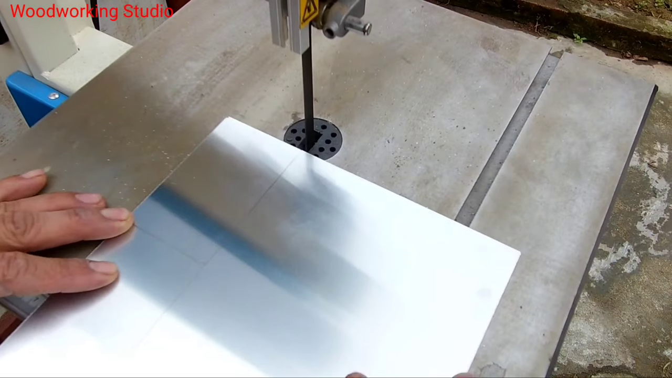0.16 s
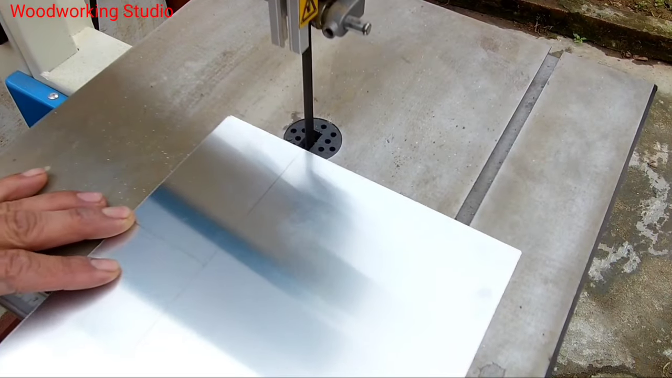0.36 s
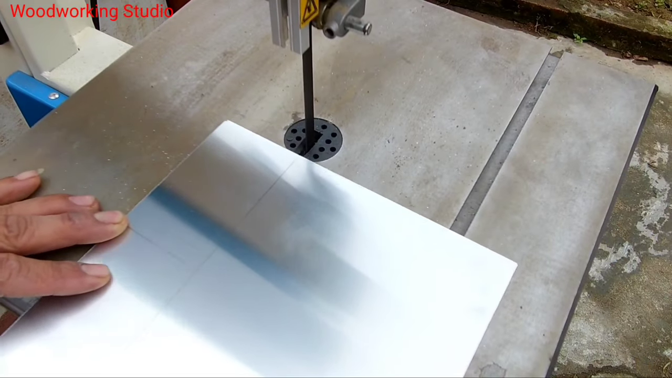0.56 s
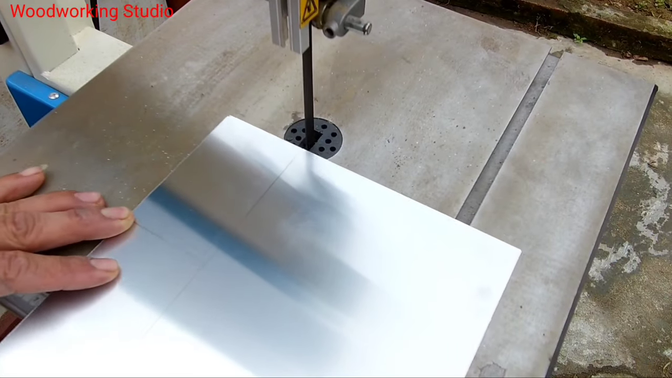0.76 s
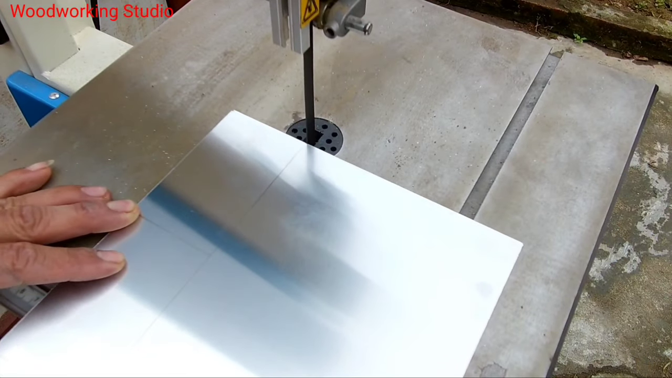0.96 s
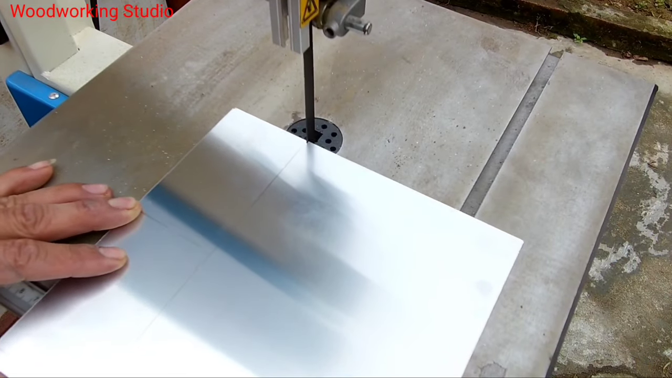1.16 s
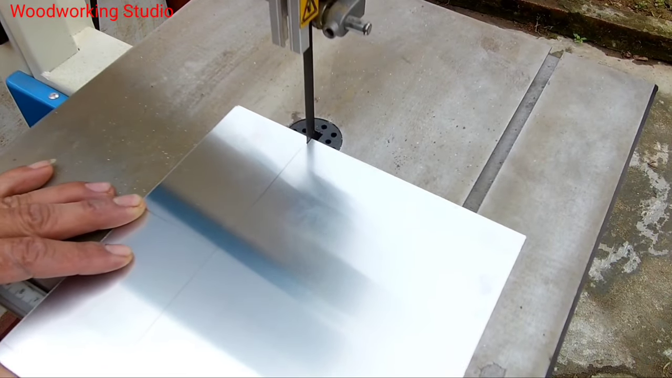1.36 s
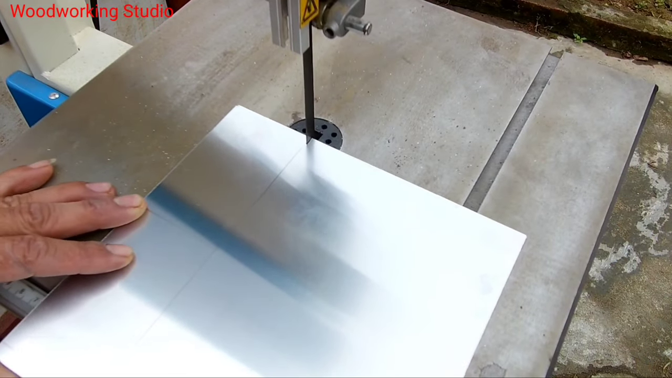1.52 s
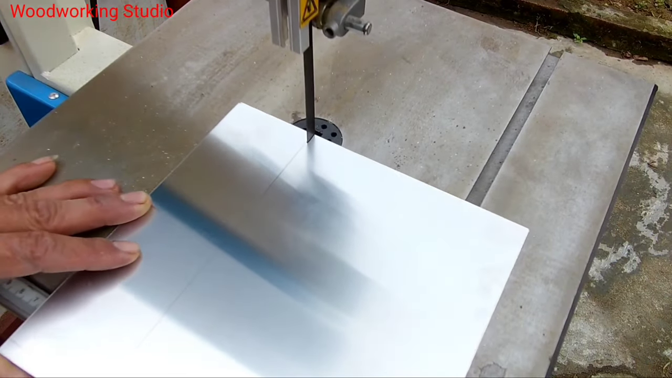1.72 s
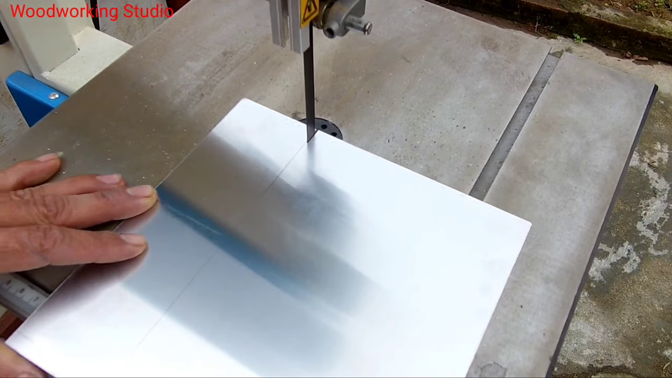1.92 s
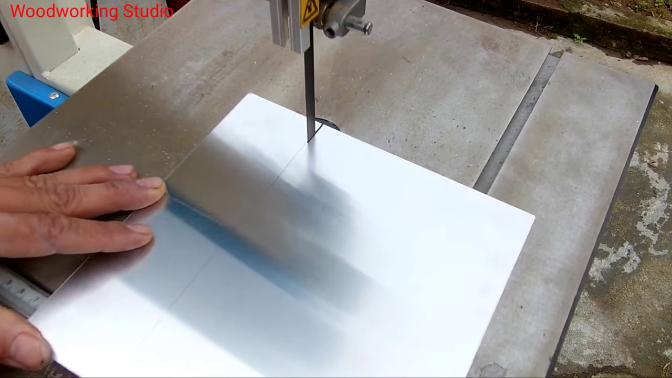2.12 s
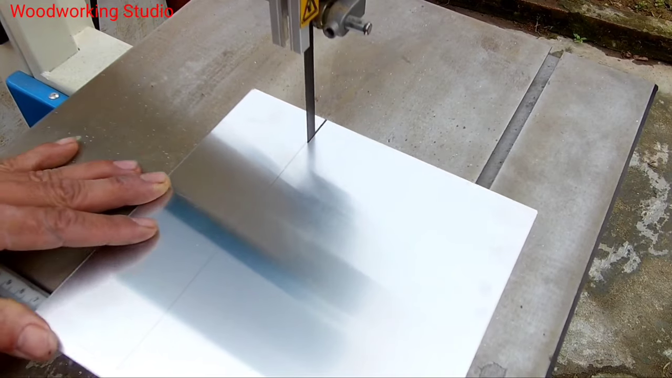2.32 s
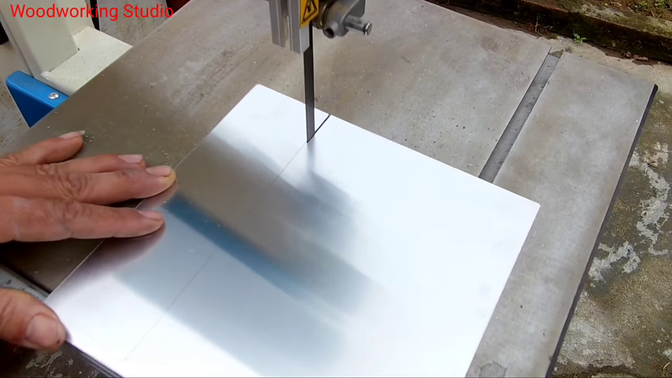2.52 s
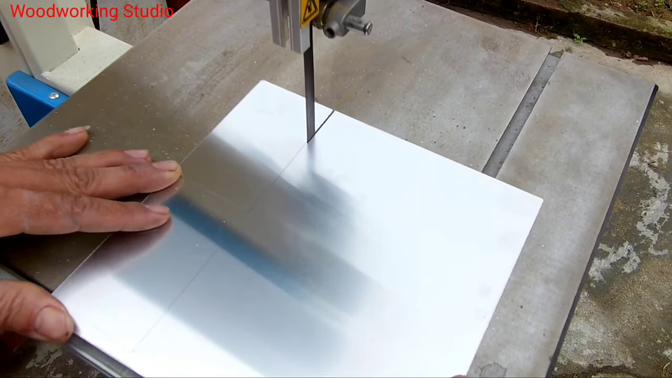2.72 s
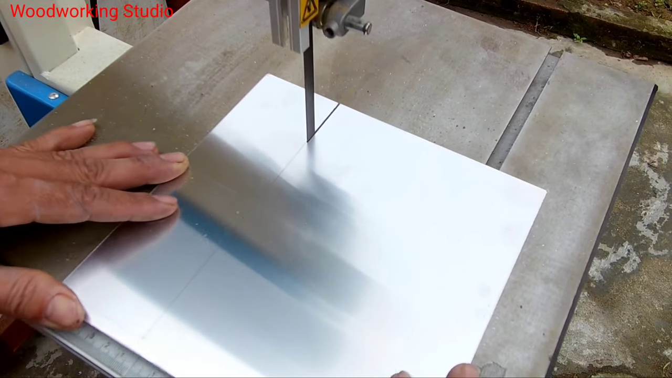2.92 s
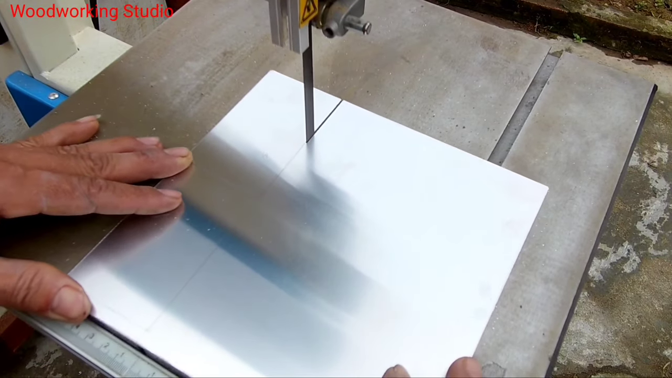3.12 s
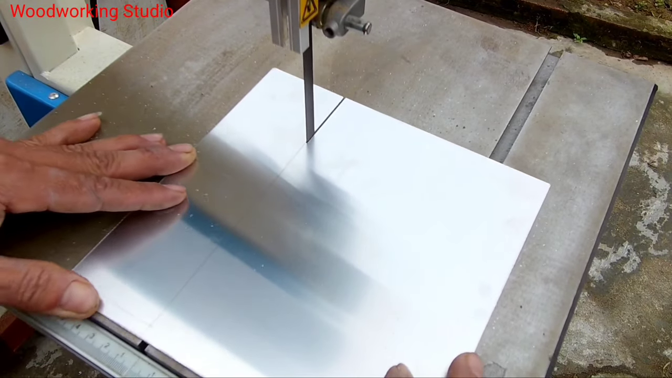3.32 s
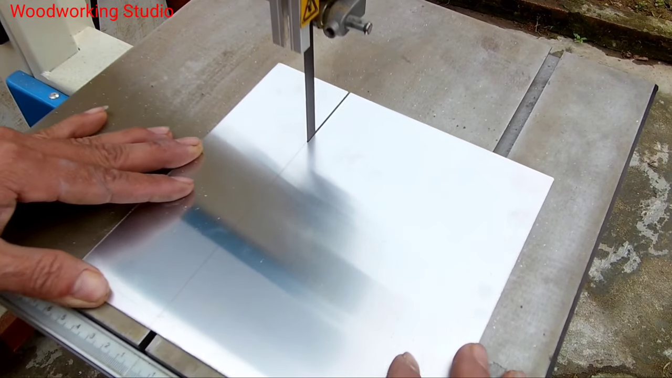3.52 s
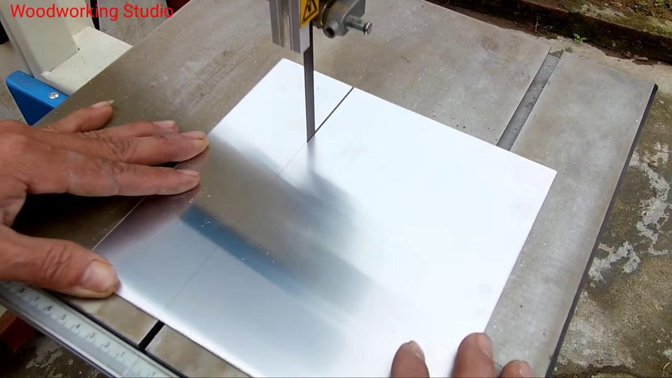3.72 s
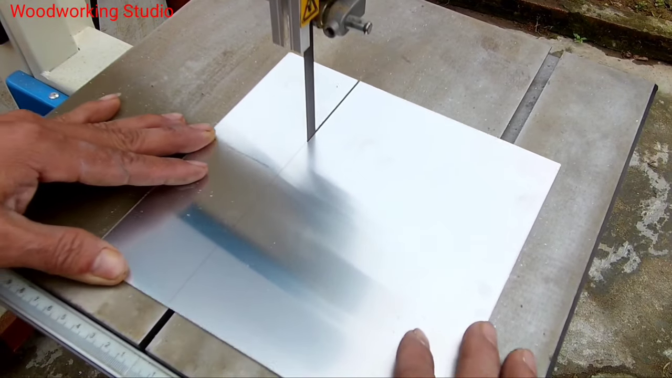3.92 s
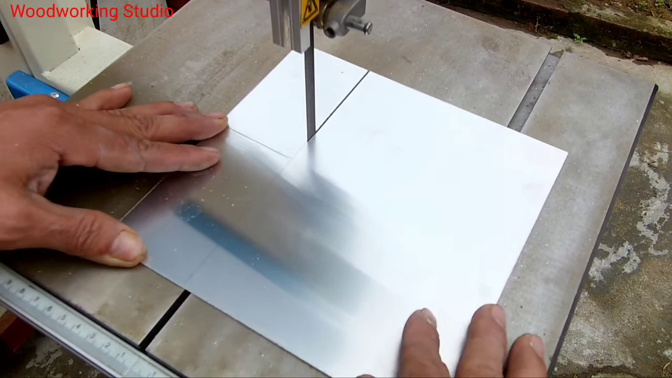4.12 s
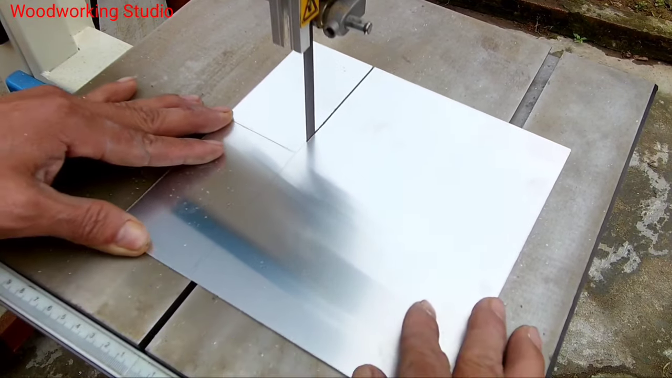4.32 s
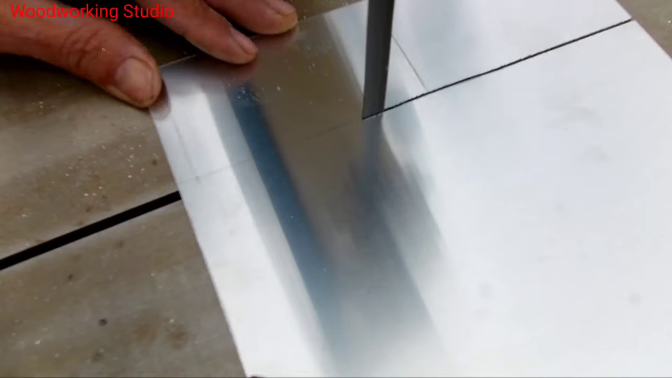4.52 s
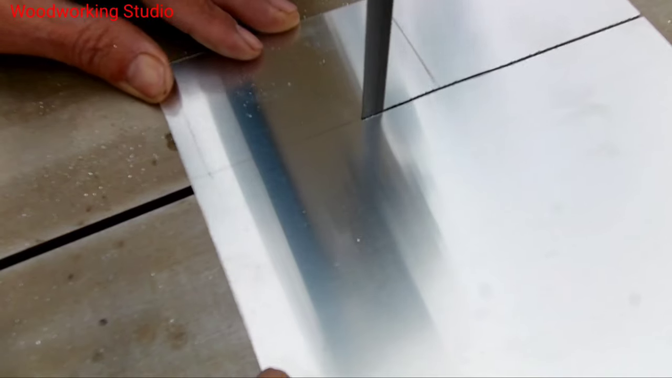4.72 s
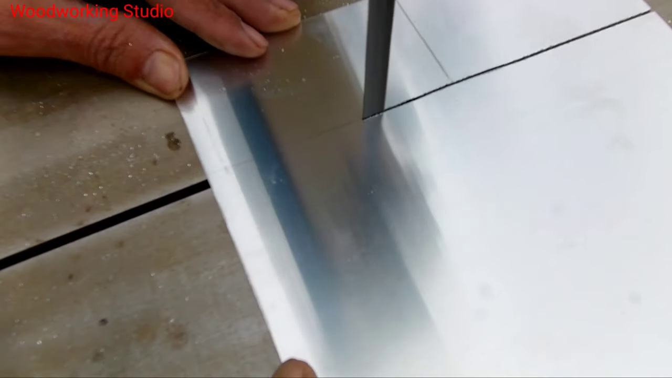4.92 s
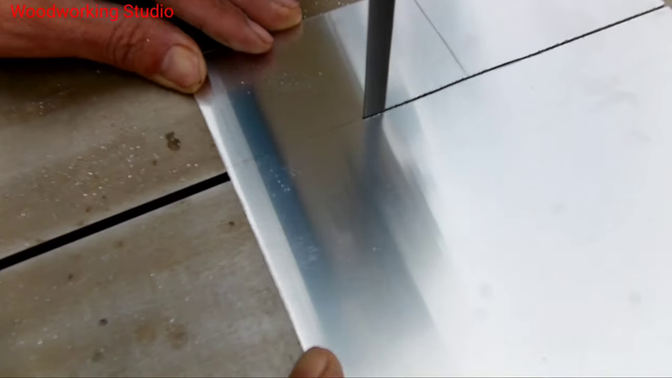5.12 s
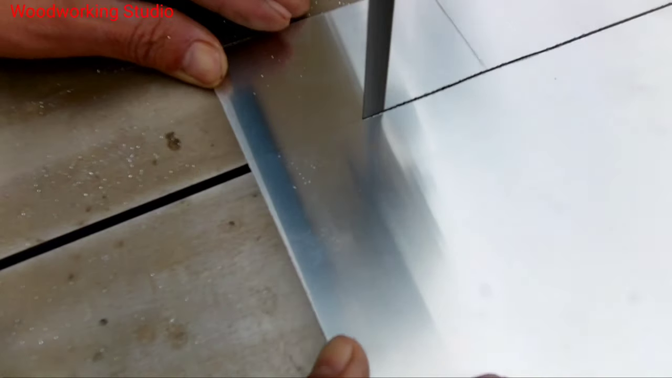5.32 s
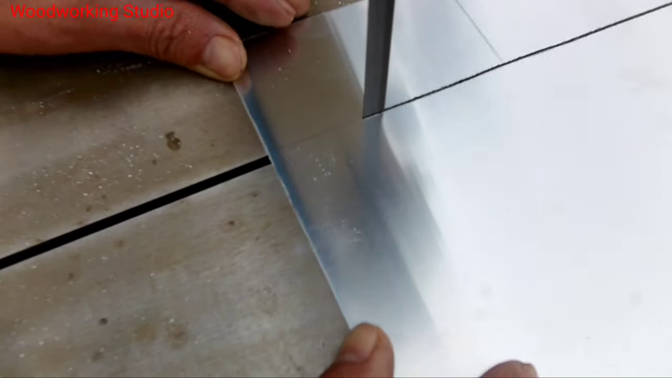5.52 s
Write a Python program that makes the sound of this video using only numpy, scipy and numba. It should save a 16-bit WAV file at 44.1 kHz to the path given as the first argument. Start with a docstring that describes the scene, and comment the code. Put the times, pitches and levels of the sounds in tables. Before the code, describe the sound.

A band saw hums quietly for a second, then bites thin sheet metal with a loud buzzing whine, rasp and rattling knocks, briefly dropping silent.

```python
"""Band saw cutting thin sheet metal

A band saw idles, then its teeth bite into a thin metal sheet pushed across the table, close to a small microphone.
Teeth strike at a nearly steady rate and whine as harmonics and narrow noise; scraping clicks ring the sheet in
resonances, one of which shifts in pitch as the cut grows; filtered clicks make the rasp and hiss of chips.
Noise through resonances makes the blade hum and tick; decaying sines are the sheet knocking on the table.
The input overloads, and the sound drops out for a moment."""
import sys
import numpy as np
from scipy import signal
from scipy.fft import rfft, irfft, next_fast_len
from scipy.io import wavfile
from scipy.ndimage import uniform_filter1d
from numba import njit

SR = 44100
rng = np.random.default_rng(int(sys.argv[2]) if len(sys.argv) > 2 else 0)


def volts(x):
    """Linear amplitude factor 10**(x/20) for a level x in dB, scalar or array-like."""
    e = np.asarray(x, float) / 20
    return 10 ** e


def bounce(signal):
    """Save signal as a 16-bit WAV file at the path given by the first command-line argument."""
    frames = np.transpose(np.atleast_2d(signal))
    limited = np.clip(frames, -1, 1)
    pcm = np.round(limited * 32767).astype(np.int16)
    wavfile.write(sys.argv[1], SR, pcm)


N = 249606
T = np.arange(N) / SR

# How hard the sheet is fed into the teeth. Each row: time in seconds, feed in dB.
FEED = [(0.97, -11), (1.05, -0.5), (1.33, 0), (1.39, 1.5), (1.586, -7), (1.69, 0), (1.8, 0), (2.3, -0.5),
        (3.0, -0.8), (3.3, -3), (3.46, -0.5), (3.6, -3), (4.05, -0.4), (4.44, -1.2), (4.62, 1),
        (4.98, -0.8), (5.1, 1), (5.66, -0.8)]
# Teeth catching the edge of the sheet. Each row: start in seconds, strength in dB.
CATCH = [(.9425, -45), (.9495, -30.5), (.9575, -39), (.9755, -45), (.9815, -31), (.9945, -31),
         (1.5416, -32), (1.5495, -36), (1.649, -38), (1.676, -30)]
# Low modes of the sheet. Each row: pitch in Hz, relative level in dB, 60 dB decay time in seconds.
SHEET_LOW_MODES = [(373.5, 3, 0.053), (740, -5.5, 0.05), (582, -10.5, 0.027)]
# The moment of silence: start and end in seconds.
DROPOUT_S = (4.4435, 4.4645)


def unit(x):
    """Scale to rms 1."""
    return x / np.sqrt(np.mean(x ** 2))


def curves(table):
    """Columns of a table whose first is time, drawn as straight lines over the samples."""
    s, *columns = np.transpose(table)
    return [np.interp(T, s, c) for c in columns]


def colour(x, points):
    """Shape a spectrum by (Hz, dB) points, then scale to rms 1."""
    hz, db = np.transpose(points)
    size = next_fast_len(N)
    f = np.maximum(np.arange(size // 2 + 1) * SR / size, 1)
    gain = volts(np.interp(np.log(f), np.log(hz), db))
    return unit(irfft(rfft(x, size) * gain, size)[:N])


@njit
def svf(x, hz, width):
    """State-variable band-pass whose centre may move."""
    y, b, l = np.empty(len(x)), 0., 0.
    for i in range(len(x)):
        g, k = np.tan(np.pi * hz[i] / SR), width[i] / hz[i]
        v = (b + g * (x[i] - l)) / (1 + g * (g + k))
        b, l, y[i] = 2 * v - b, l + 2 * g * v, k * v
    return y


def ring(x, hz, width):
    """A resonance at a fixed or moving pitch."""
    if np.ndim(hz):
        return svf(x, hz, width + 0 * hz)
    g = np.tan(np.pi * hz / SR)
    kg = g * width / hz
    return signal.lfilter([kg, 0, -kg], [1 + kg + g * g, 2 * (g * g - 1), 1 - kg + g * g], x)


def ring_twice(x, hz, width, widening):
    """Two resonances in a row, the second wider by a factor, for steeper skirts; rms 1."""
    return unit(ring(ring(x, hz, width), hz, widening * width))


def walk(rate):
    """Random levels held 1 / rate s and slewed twice; spread 1."""
    coarse = T[::16]
    k = int(SR / 16 / rate)
    held = np.repeat(rng.standard_normal(len(coarse) // k + 1), k)
    slewed = uniform_filter1d(uniform_filter1d(held, k), k)
    return np.interp(T, coarse, unit(slewed[:len(coarse)]))


def flutter():
    """Level wavering in dB, separate for each whine and mode."""
    return 1.15 * walk(14)


def wander():
    """Pitch factor of a mode pulled up and down by the flexing sheet."""
    return 1 + 0.0075 * walk(9)


def grains(rate, spread):
    """Dense random clicks, rate per second, with a long tail of large ones."""
    chance = rng.random((N, 2)).T
    size = volts(-spread * np.log(chance[1] + 1e-9))
    return unit((chance[0] < rate / SR) * size * rng.standard_normal(N))


def bursts(events, rise_s, fall_s):
    """Envelope of short swells at the given (seconds, peak dB)."""
    age = np.arange(int(.1 * SR)) / SR
    shape = (1 - np.exp(-age / rise_s)) * np.exp(-age / fall_s)
    out = np.zeros(N + len(age))
    for s, db in events:
        out[int(s * SR):][:len(age)] += volts(db) * shape / shape.max()
    return out[:N]


def swells(rows):
    """Sum of bell-shaped level changes in dB, from (seconds, dB, half length in seconds)."""
    coarse = T[::16]
    return np.interp(T, coarse, sum(db * np.exp(-((coarse - s) / half) ** 2) for s, db, half in rows))


def throb():
    """Level swing in dB from motor, wheels and belt; each wavers in depth."""
    # Each row: rate in Hz, time of one crest in seconds, usual depth in dB.
    rotations = [(47.75, 3.1, 1.2), (17.27, 2.5, 1.23), (30.3, 2.708, 1.0)]
    return sum(db * (1 + 0.5 * walk(4.0)) * np.cos(2 * np.pi * hz * (T - s)) for hz, s, db in rotations)


def wheel():
    """Turns of the wheel, whole where the teeth dig in deepest."""
    before = 12.73 * (T - 2.76)  # Hz, seconds of one crest
    after = 14.0 * (T - 4.476)
    return np.where(T < DROPOUT_S[0], before, after)


def beat_depth():
    """How deeply the cut swings once a wheel turn, as the teeth dig in and ease off."""
    # Each row: time in seconds, depth from 0 to 1.
    depth_points = [(.97, 0), (1.7, 0.53), (2.4, 0.66), (2.9, 0.54), (3.2, 0.5), (4.44, 0.13), (4.47, 0.58),
                    (5.66, 0.4)]
    return curves(depth_points)[0]


def follow(db, slope, near_db):
    """Level in dB that follows the feed by slope; the microphone is nearer after the dropout."""
    return db + slope * curves(FEED)[0] + near_db * (T > DROPOUT_S[0])


def tooth_strikes():
    """Tooth rate in Hz, sagging under load, and the jittering phase of the strikes in radians."""
    # Each row: time in seconds, tooth rate in Hz.
    speed = [(.9, 1164), (1.4, 1150), (2.0, 1147), (2.9, 1141), (3.4, 1138), (4.1, 1133), (4.5, 1140),
             (5.0, 1140), (5.66, 1132)]
    hz = curves(speed)[0]
    return hz, 2 * np.pi * np.cumsum(hz * (1 + .007 * walk(60))) / SR


def whine(scrape, hz, tooth, bite_db):
    """Harmonics of the tooth rate: pure tones mixed with noise bands smeared by uneven teeth."""
    # Each row: harmonic of the tooth rate, width of one resonance in Hz, noise share of the power 0-1,
    # share of the wheel beat 0-1.
    harmonics = [(1, 110, 0.18, 0.38), (2, 110, 0.44, 0.22), (4, 146, 0.15, 0.17), (6, 110, 0.4, 0.1),
                 (7, 170, 0.9, .2)]
    # Each row: time in seconds, level in dB of the tooth note, of its 2nd and of its 4th harmonic.
    note_levels = [(0.972, -39, -53.0, -48), (1.03, -47, -47, -36), (1.055, -48, -41, -31.5),
                   (1.1, -36, -42, -35.0), (1.2, -44, -44, -33.5), (1.32, -36, -43.0, -37),
                   (1.4, -35, -47, -35), (1.48, -37.5, -45.0, -37), (1.53, -45, -45, -53),
                   (1.6, -43, -56, -55), (1.66, -36.0, -41, -54), (1.75, -32.5, -44.5, -38.5),
                   (1.9, -33.0, -37.5, -40), (2.1, -27, -41.5, -42.5), (2.2, -31.5, -42.5, -46),
                   (2.3, -31, -35, -52), (2.42, -27.5, -37, -51), (2.5, -35, -35, -54),
                   (2.6, -31.5, -37.5, -42), (2.75, -35.5, -35.5, -45), (2.9, -34, -43, -44.5),
                   (3.05, -34, -39.5, -39), (3.15, -42, -43.0, -45), (3.22, -45, -51, -49),
                   (3.3, -49, -44, -45), (3.38, -40.5, -41.5, -39.5), (3.5, -37.5, -41.5, -36.0),
                   (3.65, -43.5, -41, -40.5), (3.8, -39, -41, -44), (3.9, -37.5, -43, -46),
                   (4.0, -40, -46, -46), (4.1, -42, -45, -46), (4.2, -41.5, -51, -40),
                   (4.3, -36, -46, -37.5), (4.43, -35.5, -29.5, -38.5), (4.48, -33, -35, -35),
                   (4.6, -32, -46, -35), (4.75, -38, -38, -38), (4.9, -33.5, -40.5, -36),
                   (5.0, -39, -37.0, -39), (5.1, -32.5, -39, -41.0), (5.25, -39, -42, -37.5),
                   (5.4, -36.5, -44, -37.0), (5.55, -42, -41, -36.5), (5.65, -44, -43, -42)]
    # Thin upper whistles. Each row: time in seconds, level in dB of the 6th and of the 7th harmonic.
    whistle_levels = [(1.0, -61, -66), (1.05, -52, -60), (1.35, -57, -72), (1.38, -52, -55),
                      (1.45, -60, -72), (1.61, -67, -73), (1.66, -58, -72), (1.75, -56, -59),
                      (2.1, -65, -70), (2.73, -61, -72), (3.0, -53.5, -57), (3.27, -61, -61),
                      (3.45, -57, -60), (3.8, -57, -58), (4.18, -63, -72), (4.35, -55, -72),
                      (4.5, -62, -66), (5.05, -54, -68), (5.35, -50, -68), (5.66, -54, -68)]
    # The tooth note breaks off as the teeth lose grip. Each row: time in seconds, dB, half length in seconds.
    note_breaks = [(1.056, -15, 0.013), (1.105, -11.0, 0.009), (1.169, -16, 0.01), (1.234, -6.5, 0.013),
                   (1.268, -17, 0.016), (1.34, -12.5, 0.013), (1.529, -3, 0.013), (1.571, -16, 0.021),
                   (1.609, -8.5, 0.006), (1.638, -10, 0.025), (1.791, -12, 0.013), (1.835, -15, 0.01),
                   (1.951, -11, 0.0079), (2.013, -14.5, 0.01), (2.083, -11.0, 0.011), (2.18, -21, 0.0091),
                   (2.237, -9, 0.015), (2.411, -22, 0.013), (2.503, -20, 0.0091), (2.558, -9.0, 0.015),
                   (2.583, -8, 0.0077), (2.659, -4, 0.019), (2.715, -10.5, 0.015), (2.883, -10, 0.017),
                   (2.963, -10, 0.013), (3.047, -18, 0.013), (3.097, -9, 0.013), (3.124, -7.0, 0.009),
                   (3.196, -18, 0.018), (3.273, -11, 0.022), (3.324, -11.0, 0.018), (3.413, -9.0, 0.006),
                   (3.493, -11, 0.011), (3.592, -16.0, 0.018), (3.662, -17.0, 0.011), (3.724, -5, 0.009),
                   (3.744, -12, 0.018), (3.823, -15.5, 0.013), (3.883, -6, 0.0054), (3.911, -11.0, 0.009),
                   (3.998, -11.0, 0.028), (4.08, -18, 0.013), (4.162, -16, 0.01), (4.197, -10.5, 0.0098),
                   (4.252, -7.5, 0.0083), (4.326, -14, 0.014), (4.4, -11, 0.025), (4.495, -11, 0.009),
                   (4.583, -10.0, 0.009), (4.671, -7.5, 0.018), (4.781, -11, 0.013), (4.873, -16, 0.0092),
                   (4.939, -14, 0.017), (5.004, -14, 0.014), (5.171, -5, 0.005), (5.236, -11, 0.018),
                   (5.293, -12.5, 0.013), (5.388, -12, 0.0098), (5.441, -9, 0.009), (5.573, -19.5, 0.019)]
    # The same for the 4th harmonic. Each row: time in seconds, dB, half length in seconds.
    fourth_breaks = [(1.017, -8.5, 0.018), (1.084, -11, 0.0098), (1.126, -7.0, 0.021), (1.348, -8.5, 0.012),
                     (1.456, -12, 0.0099), (1.499, -10, 0.0066), (1.527, -10.0, 0.025), (1.704, -5, 0.014),
                     (1.825, -16, 0.014), (2.007, -10, 0.006), (2.327, -7.5, 0.009), (2.407, -7.0, 0.009),
                     (2.462, -10.0, 0.02), (2.528, -8.5, 0.006), (2.645, -7.0, 0.009), (2.805, -5, 0.025),
                     (2.97, -7.0, 0.009), (3.092, -8.5, 0.008), (3.14, -9, 0.018), (3.258, -7.0, 0.0093),
                     (3.367, -5, 0.0083), (3.56, -6.5, 0.01), (3.596, -2, 0.029), (3.665, -6, 0.009),
                     (3.764, -9.0, 0.015), (3.878, -6.5, 0.025), (4.061, -7.0, 0.025), (4.151, -12, 0.018),
                     (4.209, -7.0, 0.013), (4.792, -7.0, 0.021), (5.02, -10.5, 0.023), (5.122, -5, 0.025),
                     (5.5, -5, 0.0058)]
    note_db, second_db, fourth_db = curves(note_levels)
    levels = [note_db + swells(note_breaks), second_db, fourth_db + swells(fourth_breaks)]
    levels += curves(whistle_levels)
    turn = 2 * np.pi * wheel()
    # the second harmonic makes a short dig and a long ease
    beat = beat_depth() * (np.cos(turn) + 0.97 * np.cos(2 * turn))
    out = 0
    for (k, width, rough, beat_share), db in zip(harmonics, levels):
        uneven = ring_twice(scrape, k * hz, width, 1)
        gain = volts(db + 0.1 * bite_db + flutter()) * (1 + beat_share * beat)
        out = out + gain * (np.sqrt(2 * (1 - rough)) * np.cos(k * tooth) + np.sqrt(rough) * uneven)
    return out


def moving_mode(scrape, bite_db):
    """A sheet resonance whose pitch shifts as the cut grows."""
    # Each row: time in seconds, pitch in Hz, level in dB, width of the narrower resonance in Hz.
    path = [(.97, 1830, -69, 150), (1.44, 1900, -40, 170), (1.59, 1930, -69, 170), (1.68, 1990, -41, 170),
            (1.95, 1950, -31, 120), (2.3, 1965, -33, 129), (2.72, 1871, -49.5, 250),
            (3.07, 1894, -42.5, 246), (3.5, 1850, -40.5, 199), (3.6, 1866, -42, 162),
            (4.06, 1888, -28.5, 133), (4.33, 1900, -30.5, 141), (4.47, 1880, -40.5, 300),
            (4.8, 1870, -51, 350), (5.0, 1715, -38.5, 250), (5.26, 1930, -38, 350), (5.66, 1840, -43, 345)]
    hz, db, width = curves(path)
    tone = ring_twice(scrape, hz * wander(), width, 2.4)
    return volts(db + 0.47 * bite_db + flutter()) * tone


def sheet_modes(scrape, bite_db):
    """Sheet resonances rung by the scraping; they follow the feed and drift while the cut lasts."""
    # Each row: pitch in Hz, width of the narrower resonance in Hz, level in dB, dB per dB of feed,
    # drift in dB per second of cutting, dB gained when the microphone is nearer.
    modes = [(1250, 130, -39, 1.2, -2.2, 4), (1560, 520, -40, 1.1, -.6, 2.5),
             (2170, 117, -40, 1.6, -.6, 10), (2630, 200, -55, 1.1, -.3, 1.5), (3150, 330, -64, 1.1, 2.5, 3),
             (6200, 1480, -55, 1.2, .6, 1.5)]
    # A list for each mode, which swells or fades for a while. Each row: time in seconds, dB gained,
    # half length in seconds.
    mode_swells = [
        [(2.7, 1.5, .3), (3.4, -8, .3), (5.6, -10, .25)],
        [(2.8, -3, .55), (5.15, 3, .2)],
        [(2.3, 4, .4), (4.05, 3, .25)],
        [(2.75, 9, .5)],
        [(2.3, 5, .3)],
        [(2.7, 2.5, .5), (5.22, 7.5, .25)],
    ]
    out = 0
    for (hz, width, db, slope, drift, near_db), rows in zip(modes, mode_swells):
        level_db = follow(db, slope, near_db) + drift * (T - FEED[0][0]) + swells(rows)
        level_db = level_db + 0.47 * bite_db + flutter()
        # only the first of the two resonances wanders
        tone = unit(ring(ring(scrape, hz * wander(), width), hz, 3.1 * width))
        out = out + volts(level_db) * tone
    return out


def squeal(scrape):
    """A thin squeal high in the treble: scraping through a moving resonance."""
    # Each row: time in seconds, pitch in Hz, level in dB.
    path = [(.97, 14050, -72), (1.1, 14000, -64), (1.6, 13950, -74), (3.35, 13850, -79), (3.55, 13800, -67),
            (3.78, 13450, -62), (3.95, 13220, -65), (4.04, 13400, -80), (4.2, 13600, -54),
            (4.3, 13620, -66), (4.44, 13750, -76), (5.3, 13750, -68), (5.66, 13590, -59)]
    hz, db = curves(path)
    return volts(db + 2.2 * flutter()) * ring_twice(scrape, hz * wander(), 600, 1.5)


def low_drone(scrape, bite_db):
    """The scraping keeps the sheet's low modes sounding, most while the teeth ease off."""
    # a resonance is the wider, the faster it decays
    drone = sum(volts(db) * unit(ring(scrape, hz, 3.6 / t60)) for hz, db, t60 in SHEET_LOW_MODES)
    ease = 1 + 0.51 * beat_depth() * np.cos(2 * np.pi * wheel() - 2.7)
    return volts(follow(-53, 0.45, 4.4) + 0.85 * bite_db) * ease * unit(drone)


def chip_snaps():
    """Envelope of chips snapping off: the loudest at set times, smaller ones at random."""
    # Each row: start in seconds, strength in dB.
    loudest = [(1.0567, -54), (1.0891, -46), (1.1814, -47), (1.2438, -46), (1.3136, -38), (1.376, -42),
               (1.4214, -44), (1.4787, -41), (1.5411, -41), (1.6758, -52), (1.7985, -38), (1.8748, -36),
               (2.1123, -39), (2.1592, -48), (2.5433, -34), (2.7035, -38), (2.9374, -41), (3.01, -42),
               (3.1021, -48), (3.1744, -36), (3.2348, -44), (3.3994, -40), (3.476, -39), (3.5071, -45),
               (3.6388, -39), (3.804, -36), (4.045, -39), (4.205, -40), (4.3362, -49), (4.5069, -38),
               (4.6115, -37), (4.7084, -43), (4.9068, -46), (4.9913, -39), (5.3524, -43)]
    start_s = FEED[0][0]
    when, size = rng.random((10, 2)).T
    small = zip(start_s + when * (T[-1] - start_s), -55 + np.log(size + 1e-3))
    return bursts(loudest + list(small), .0004, 0.0032)


def rasp(scrape, tooth, bite_db, snaps):
    """Broad scraping with sheet resonances and weak tooth harmonics, jolted by snapping chips."""
    # Spectrum of the scraping. Each row: frequency in Hz, relative level in dB.
    spectrum = [(120, -57), (200, -65), (358, -11.5), (556, -10.5), (661, -5), (920, -5.5), (1150, -2.5),
                (1500, -14), (2220, -1), (3240, -12), (4660, -7), (5040, -9.5), (7010, -46), (8600, -86),
                (11200, -61), (18900, -120)]
    # Sheet resonances. Each row: pitch in Hz, width in Hz, level in dB against the scraping.
    resonances = [(2493, 117, -11.5), (4240, 110, -18), (4770, 22, -26.5), (5640, 78, -28)]
    # Weaker tooth harmonics. Each row: harmonic number, amplitude in dB against the scraping.
    overtones = [(3, -20), (5, -23)]
    x = colour(scrape, spectrum)
    for hz, width, db in resonances:
        x = x + volts(db + 2.4 * flutter()) * unit(ring(scrape, hz * wander(), width))
    for k, db in overtones:
        x = x + volts(db + 3.1 * walk(30)) * np.cos(k * tooth)
    return (volts(follow(-37, 0.7, 5.34) + bite_db) + 1.6 * snaps) * unit(x)


def chips(bite_db, snaps):
    """Dense treble clicks hiss as chips fly, louder with the feed and at each snap."""
    # Each row: frequency in Hz, relative level in dB.
    spectrum = [(4710, -4), (8000, -5), (8250, -5), (8740, -33), (9960, 2), (12000, 16.5), (13700, 14),
                (15000, -5), (15800, 16)]
    hiss = colour(grains(14000, 0.97), spectrum)
    hiss = hiss * volts(1.5 * bite_db + 1.8 * walk(70) + 1.7 * walk(9.8))
    return (volts(follow(-60.5, 3.9, 7.8)) + 0.27 * snaps) * unit(hiss)


def cutting():
    """Sum of all that the bite excites: whine, sheet, squeal, low drone and rasp share one scrape; the chips
    hiss from clicks of their own."""
    # The teeth skip and the whole cut drops for a moment. Each row: time in seconds, dB, half length in seconds.
    skips = [(1.004, -1, .006), (1.078, -0.5, 0.0096), (1.17, -4, 0.0093), (1.236, -7, 0.0057),
             (1.266, -2.5, 0.0091), (1.343, -3.5, 0.014), (1.458, -2, .008), (1.5, -4.5, 0.0063),
             (1.531, -5, 0.0085), (1.562, -5, 0.0074), (1.704, -6.5, 0.0073), (2.18, -1.5, 0.0077),
             (3.32, -0.5, 0.0089), (3.365, 0, 0.0089)]
    hz, tooth = tooth_strikes()
    bite_db = throb() + 0.67 * walk(25.02)
    scrape = grains(12000, 2.43) * (1 + 0.25 * np.cos(tooth))
    snaps = chip_snaps()
    out = whine(scrape, hz, tooth, bite_db)
    out = out + moving_mode(scrape, bite_db) + sheet_modes(scrape, bite_db) + squeal(scrape)
    out = out + low_drone(scrape, bite_db)
    out = out + rasp(scrape, tooth, bite_db, snaps) + chips(bite_db, snaps)
    onset = np.clip((T - FEED[0][0]) / 0.006, 0, 1)
    return out * volts(swells(skips)) * onset


def catches():
    """Short bursts of scraping as single teeth snag."""
    spectrum = [(200, -26), (400, -35), (1250, 12.5), (1600, 9.0), (2600, -1.0), (3500, -14), (4600, 2),
                (5600, -12), (9000, -27), (15000, -35)]  # Hz, relative dB
    scrape = colour(rng.standard_normal(N), spectrum)
    return bursts(CATCH, 0.0013, 0.0045) * scrape


def knocks():
    """The sheet knocks dully on the table, ringing its own low modes as decaying sines."""
    # The hardest knocks. Each row: start in seconds, strength in dB.
    hardest = [(0.954, -34), (1.004, -34), (1.181, -36), (1.239, -34.5), (1.321, -36), (1.477, -32.5),
               (1.773, -31.5), (2.641, -30.5), (2.942, -33), (3.107, -33.5), (3.407, -33.5), (3.807, -33),
               (4.14, -33.5), (4.306, -31.5), (4.378, -31), (4.508, -31.5), (4.57, -29), (4.81, -32),
               (4.929, -29.5), (5.361, -31), (5.634, -28)]
    age = np.arange(int(.15 * SR)) / SR
    out = np.zeros(N + len(age))
    hard_s = np.transpose(hardest)[0]
    # steady knocks come once a wheel turn, a third of a turn after the teeth dig in
    due = T[1:][np.diff(np.floor(wheel() - .33)) != 0]
    # a hard knock takes the place of the steady one beside it
    steady = [s for s in due if s > 1.7 and np.abs(hard_s - s).min() > .03]
    steady_db = -38.5 + 3.5 * rng.standard_normal(len(steady))
    events = hardest + list(zip(steady, steady_db))
    for (s, db), (detune, phase) in zip(events, rng.standard_normal((len(events), 2))):
        modes = 0
        for hz, mode_db, t60 in SHEET_LOW_MODES:
            tone = np.sin(2 * np.pi * hz * (1 + 0.032 * detune) * age + phase)
            modes = modes + volts(mode_db - 60 * age / t60) * tone
        out[int(s * SR):][:len(age)] += volts(db) * (1 - np.exp(-age / 0.0032)) * modes
    return out[:N]


def rumble():
    """The sheet shudders on the table in uneven low thuds: sparse clicks through a low spectrum."""
    # Each row: time in seconds, level in dB before the common trim below.
    level_points = [(1.0, -81), (1.06, -75), (1.38, -61), (1.64, -78), (1.66, -61), (1.91, -52), (3.6, -84),
                    (4.01, -62), (4.04, -50), (4.39, -67), (4.52, -46), (4.62, -52.5), (5.63, -53),
                    (5.66, -65)]
    # Each row: frequency in Hz, relative level in dB.
    spectrum = [(15, -13), (40, -5), (90, -1.5), (150, -4.5), (230, -15), (400, -50), (20000, -120)]
    thuds = colour(grains(400, 3.2), spectrum) * volts(2.3 * walk(15))
    return volts(curves(level_points)[0] - 5.5) * unit(thuds) * (T > FEED[0][0])


def blade():
    """Noise rings the running blade's modes over the rumble of the frame; idle, it brushes its guides."""
    # Modes of free blade and frame. Each row: pitch in Hz, width of the narrower resonance in Hz,
    # relative level in dB before division by the root of the width.
    blade_modes = [(300, 50, -9.5), (331.4, 26, -1), (452, 33, -12), (683, 23, -2), (771, 77, -6.5),
                   (897, 72, -10), (962, 20, -10), (1132, 12, -20.5), (1380, 110, -16.5), (1620, 37, -16),
                   (1950, 53, -18), (2252, 64, -19), (2920, 120, -21.5), (3330, 33, -33.5),
                   (4180, 300, -29.5), (4650, 190, -35.5), (5180, 310, -37), (6500, 300, -39.5)]
    # The hum rises as the sheet comes near. Each row: time in seconds, level in dB of the modes while free.
    hum_level = [(0.0, -52), (.55, -51.5), (.93, -50)]
    # Spectrum of the frame's rumble. Each row: frequency in Hz, relative level in dB.
    frame_spectrum = [(12, -57), (20, -20), (195, -13.5), (324, -27), (514, -14), (681, 1), (1190, -24),
                      (1580, -15), (2920, -25), (3410, -38), (9000, -51), (11700, -88), (19800, -120)]
    # Brushing ticks of the idle blade on its guides. Each row: start in seconds, level in dB.
    ticks = [(.143, -74), (.274, -68), (.343, -62), (.411, -62), (.474, -65), (.540, -68), (.702, -70),
             (.787, -75), (.889, -66)]
    # Resonances of a tick. Each row: pitch in Hz, width of the narrower one in Hz, relative level in dB.
    tick_modes = [(2900, 150, 7), (2230, 120, 0), (4170, 450, -4), (5180, 480, -10), (6500, 270, -12),
                  (7600, 600, -17)]
    drive = rng.standard_normal(N)
    modes = sum(volts(db) / np.sqrt(w) * ring(ring(drive, hz, w), hz, 2.0 * w) for hz, w, db in blade_modes)
    frame = colour(rng.standard_normal(N), frame_spectrum)
    # the sheet pressed against the blade damps its free hum by 2.5 dB
    level_db = curves(hum_level)[0] - 2.5 * (T > CATCH[0][0])
    hum = volts(level_db + 0.99 * throb() + 1.46 * walk(13)) * (unit(modes) + volts(-9.5) * frame)
    brush = sum(volts(db) * ring_twice(drive, hz, w, 2.0) for hz, w, db in tick_modes)
    return hum + bursts(ticks, .004, 0.0047) * unit(brush)


def scene():
    """The cut over the running blade, as one channel."""
    return (cutting() + catches() + knocks() + rumble() + blade())[None]


def roll_off(x):
    """The treble ends steeply here."""
    return signal.sosfilt(signal.butter(12, 16380, fs=SR, output="sos"), x)


def record(dry):
    """The input saturates unevenly (which adds a low rumble), the housing notches the treble, a gap mutes all."""
    # Dips of the housing. Each row: centre in Hz, half width in Hz, depth in dB.
    housing_dips = [(3500, 550, -2), (7380, 380, -3), (8770, 650, -11), (8700, 140, -12), (14900, 150, -18)]
    ceiling, lopsided, drive_db, knee = 0.066, 0.018, 2.0, 3.75  # a higher knee bends later
    x = dry[0] * volts(drive_db) / ceiling
    x = x + lopsided * x ** 2
    x = ceiling * x / (1 + np.abs(x) ** knee) ** (1 / knee)
    x = signal.sosfilt(signal.butter(1, 25, "high", fs=SR, output="sos"), x)
    x = signal.sosfilt(signal.ellip(10, .2, 60, 15450, fs=SR, output="sos"), x)  # steep top limit
    size = next_fast_len(N)
    f = np.arange(size // 2 + 1) * SR / size
    dips_db = sum(db * np.exp(-((f - hz) / width) ** 2) for hz, width, db in housing_dips)
    x = irfft(rfft(x, size) * volts(dips_db), size)[:N]
    outside_s = np.maximum(DROPOUT_S[0] - T, T - DROPOUT_S[1])
    x = x * np.clip(outside_s / 0.0001, 0, 1)
    return roll_off(x[None])


dry = scene()
out = record(dry)
bounce(out)
```